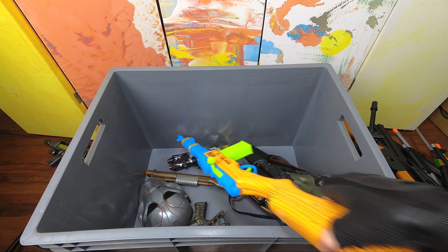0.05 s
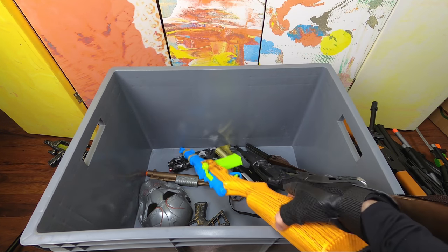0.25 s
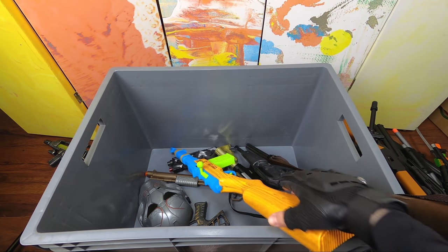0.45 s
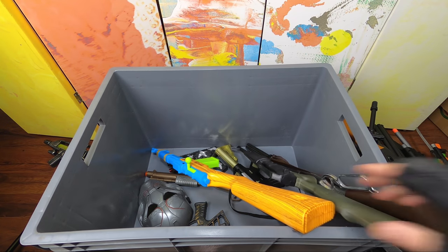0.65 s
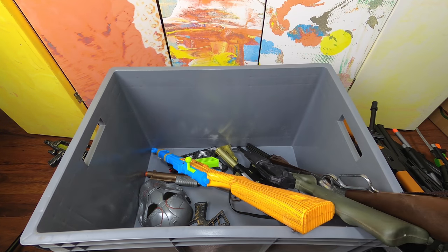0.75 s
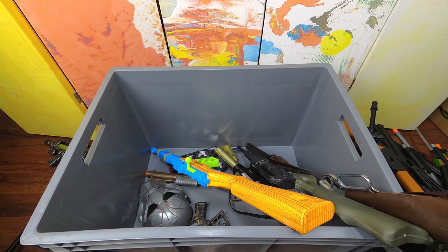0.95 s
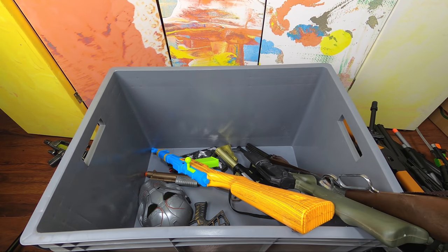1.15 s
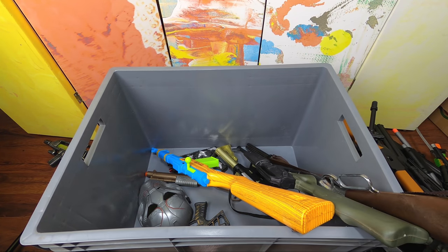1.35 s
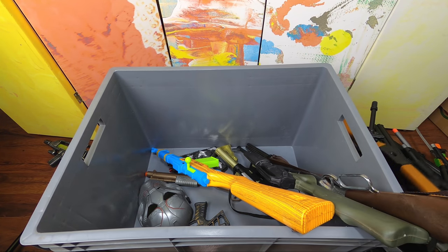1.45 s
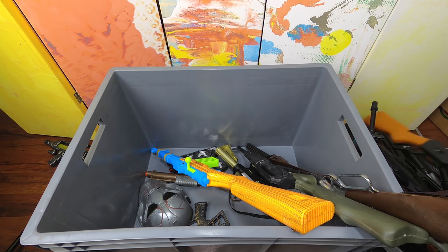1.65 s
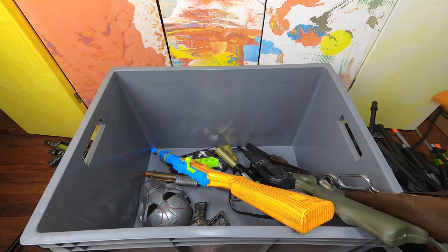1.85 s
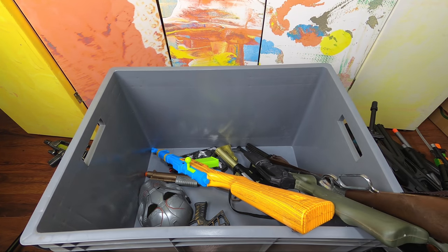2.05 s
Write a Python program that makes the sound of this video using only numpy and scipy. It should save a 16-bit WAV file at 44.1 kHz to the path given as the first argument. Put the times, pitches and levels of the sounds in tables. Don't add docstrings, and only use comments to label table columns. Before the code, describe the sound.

After faint glove clicks, a hard toy gun hits a crate of toys in a rapid burst of clacks and rattles, booms out, then another toy is softly lifted from a heap; close-miked, short indoor echo.

```python
import sys
import numpy as np
from scipy import signal
from scipy.fft import rfft, irfft
from scipy.io import wavfile
from scipy.ndimage import uniform_filter1d

SR = 44100
rng = np.random.default_rng(int(sys.argv[2]) if len(sys.argv) > 2 else 0)


def persist_wave(psi):
    counts = np.round(np.clip(psi, -1, 1) * 32767).astype(np.int16)
    wavfile.write(sys.argv[1], SR, np.atleast_2d(counts).T)


def how_loud(loudness_db):
    steps = np.asarray(loudness_db, float) / 20
    return 10 ** steps


N = 92610

# pitch_hz [Hz], width_hz [Hz], level_db [dB]
SHELL_TONES = [(1023, 57, -35), (1493, 47, 10), (2034, 43, -1.5), (2730, 180, -2), (3220, 230, -3.5),
               (4600, 61, -37)]
SHELL_DB = -5
IMPACT_MS = 0.57
KNOCK_LO_HZ, KNOCK_HI_HZ = 302, 1240
SPREAD = 0.43
SIDES = np.array([[1], [-1]])


def band(x, lo_hz, hi_hz, order=2):
    sos = signal.butter(order, [lo_hz, min(hi_hz, .45 * SR)], "band", fs=SR, output="sos")
    return signal.sosfilt(sos, x)


def unit(x):
    return x / np.abs(x).max()


def fade(t, t60):
    return np.exp(-np.log(1000) * t / t60)


def stereo(middle, side):
    return middle + side * SIDES


def pan(db):
    return how_loud(db * SIDES / 2)


def coloured(x, colour, db):
    c = np.array(colour)
    hz = np.fft.rfftfreq(N, 1 / SR) + 1
    colour_db = np.interp(np.log(hz), np.log(c[:, 0]), c[:, 1], left=-70, right=-70)
    y = irfft(rfft(x) * how_loud(colour_db), N)
    return y * how_loud(db) / np.sqrt(np.mean(y ** 2))


def add(out, x, s):
    i = max(int(s * SR), 0)
    out[..., i:i + x.shape[-1]] += x[..., :N - i]


def rings(x, hz, width, gain):
    total = 0
    for f, w, g in zip(hz, width, gain):
        b, a = signal.iirpeak(f, f / w, fs=SR)
        total = total + g * signal.lfilter(b, a, x)
    return unit(total)


def contacts(table, chatter_ms, impact_ms, top_hz, shell, shell_db, scatter, low_hz, softer_per_db=0):
    out = np.zeros((2, N))
    ms = np.arange(4096) * 1000 / SR
    shell = np.array(shell)
    k = len(shell)
    for s, db, hz, knock_db, tick_db in table:
        u = rng.random((3, 28))
        g = rng.standard_normal((2, 16))
        noise = rng.standard_normal((2, len(ms)))

        lag = -np.log(u[0]) * chatter_ms * (np.arange(28) > 0)
        length_ms = impact_ms * (1 + softer_per_db * max(-11 - db, 0))
        since = np.maximum(ms - lag[:, None], 0) / length_ms
        strength = np.exp(-lag / chatter_ms / 2) * np.where(lag > 0, u[1], how_loud(3.5))
        force = strength @ (since * np.exp(-since))
        blow = force * stereo(noise[0], SPREAD * noise[1])
        blow[:, :2] += 0.3 * np.sqrt(np.sum(blow ** 2) / 4)

        shell_hz = shell[:, 0] * (1 + 0.045 * scatter * g[0, :k])
        shell_gain = how_loud(shell[:, 2] + scatter * 9.5 * g[1, :k])
        body = rings(blow, shell_hz, 2.2 * shell[:, 1], shell_gain)
        ring = rings(blow, [hz], [hz / 9], [1])

        hollow_hz = low_hz * (KNOCK_HI_HZ / low_hz) ** ((np.arange(12) + u[2, :12]) / 12)
        low_blow = band(blow[:1], low_hz / 2, 2 * KNOCK_HI_HZ)
        knock = rings(low_blow, hollow_hz, hollow_hz / 7, np.sign(g[0, -12:]))

        crack = unit(band(blow, hz / 2.47, hz * 3.18))
        tick = unit(band(force * stereo(noise[0], noise[1]), 4030, min(9030, 2 * top_hz)))
        clack = how_loud(-5) * ring + how_loud(shell_db) * body + how_loud(-4.5) * crack
        clack = unit(band(clack, KNOCK_LO_HZ, top_hz))
        add(out, how_loud(db) * (clack + how_loud(knock_db + 2) * knock + how_loud(tick_db - 1) * tick), s)
    return out


def rifle_landing():
    # start_s [s], level_db [dB, peak], pitch_hz [Hz, loudest ring], knock_db [dB], tick_db [dB]
    landings = [(.3195, 3, 4200, -16, -29), (.335, 0.5, 4100, -10, -23), (.347, -3, 3150, -13, -15),
                (.360, -2, 4260, -30, -18), (.384, -7, 1460, -26, -22), (.439, -8.5, 2050, -5, -3.5),
                (.538, -15.5, 1430, -9, -23), (.555, -26, 2000, 3.5, 8), (.588, -4, 617, -4, -32),
                (.594, -2.5, 2340, -5, -8.5), (.631, -22, 1130, 10, -22), (.653, -5, 2960, -33, -3),
                (.663, -7, 1620, -6.5, -29), (.682, -0.5, 1580, -10, -42), (.717, -5.5, 3970, -9, -19),
                (.754, -1, 2880, -16, -11.5), (.781, -9.5, 1400, -2, -39), (.856, -10.5, 1530, -8, -6),
                (.872, -13, 1090, -7.5, -7)]
    return contacts(landings, 6.33, IMPACT_MS, 6020, SHELL_TONES, SHELL_DB, 0.82, KNOCK_LO_HZ)


def more_landings():
    # start_s [s], level_db [dB, peak], pitch_hz [Hz, loudest ring], knock_db [dB], tick_db
    # [dB]
    more_contacts = [(.327, -7, 1510, -8.5, -17), (.352, -9, 1150, -9, -20), (.370, -8, 2100, -4.5, -20),
                     (.392, -12.5, 1560, 0.5, -25), (.412, -11.5, 2500, -12, -24), (.448, -9, 1500, -12, -41),
                     (.468, -14.5, 2000, -15, -6), (.505, -18, 2340, -17, -18), (.602, -6, 700, -8, -21),
                     (.612, -15, 625, -2, -22), (.623, -11, 634, -12, -20), (.670, -10, 1100, -6, -25),
                     (.691, -4.5, 960, -9, -19), (.702, -6, 1470, -17, -19), (.711, -7.5, 1370, -12, -15),
                     (.723, -19.5, 5500, 3.5, -15), (.741, -24, 2000, 6.5, -18), (.759, 0, 1530, -19, -17),
                     (.770, -8, 3570, -3.5, -15), (.790, -10, 1830, -3.5, -30), (.801, -16, 910, -4, -17),
                     (.830, -14, 2590, -12, -26), (.863, -12.5, 1660, -12, -28), (.885, -21.5, 2530, -8, -30)]
    return contacts(more_contacts, 4.68, IMPACT_MS, 6500, SHELL_TONES, SHELL_DB, 0.57, KNOCK_LO_HZ)


def glove_touches():
    # start_s [s], level_db [dB, peak], pitch_hz [Hz, loudest ring], knock_db [dB], tick_db [dB]
    touches = [
        (.026, -32.5, 2480, -38, -9),
        (.038, -33.5, 4960, -35, 2.5),
        (.100, -47, 2560, -4, -16),
        (.182, -25.5, 2640, -44, 0.5),
        (.240, -1, 3800, -13, -7.5),
        (.246, -1, 3960, -16, -10),
    ]
    # pitch_hz [Hz], width_hz [Hz], level_db [dB]
    toy_tones = [(540, 76, -8), (2220, 97, 1.5), (3950, 77, 3), (5070, 220, -6.5), (6070, 110, 1)]
    return contacts(touches, 3.73, IMPACT_MS, 5470, toy_tones, 1.5, 0.086, KNOCK_LO_HZ)


def crate_boom():
    # start_s [s], level_db [dB], contact_ms [ms], spot [0-1 across the wall]
    blows = [(0.243, -12, 4.9, 0.18), (0.291, -11, 2.7, 0.58), (.333, 2, 2.08, 0.21),
             (0.363, -0.5, 1.4, .35), (.402, -2.5, 0.91, 0.26), (0.437, -30, 1.4, 0.31),
             (0.538, -11, 1.8, 0.38), (0.597, -5, 2.1, 0.35), (.655, -10.5, 2.6, 0.34),
             (0.702, -6.5, 1.5, 0.42), (.756, 1, 3.64, 0.37), (.80, -2.5, 2.17, 0.21), (.83, 0, 4.3, 0.22),
             (.865, -2, 4.55, 0.34), (0.977, -1, 7.6, 0.4), (1.101, -17.5, 10.5, 0.46),
             (1.188, -15.5, 10.2, 0.17), (1.354, -12, 11.4, 0.16), (1.402, -15.5, 7, 0.13),
             (1.499, -9, 13.9, 0.24), (1.678, -35.5, 7.1, 0.22)]
    # [s, t60]
    wall_tones = [(56.4, -21, 0.98), (75.17, -1, 0.68), (78.06, -2.5, 0.49), (102.75, 0.5, 0.52),
                  (128.3, 3, 0.29), (162.2, -14, 0.43), (165.3, -3.5, 0.16), (197.06, 4, 0.29),
                  (250.4, -15, 0.4), (260, -5.5, 0.23), (295, -4, 0.36)]
    out = np.zeros(N)
    t = np.arange(SR // 2 + 9000) / SR
    hz, level_db, t60 = np.array(wall_tones).T[:, :, None]
    tones = np.sin(2 * np.pi * hz * t) * fade(t, t60)
    for s, db, ms, spot in blows:
        push = np.sin(np.pi * np.clip(t[:600] * 1000 / ms, 0, 1)) ** 2
        shape = np.cos(np.pi * spot * np.arange(len(hz)))
        wall = (how_loud(level_db[:, 0]) * shape) @ tones
        add(out, how_loud(db) * 0.38 * signal.fftconvolve(wall, push / push.sum()), s)
    return out


def next_toy():
    # start_s [s], level_db [dB, peak], pitch_hz [Hz, loudest ring], knock_db [dB], tick_db [dB]
    heap_touches = [(1.256, -45.5, 1960, -48.5, 4.5), (1.314, -36, 1770, -22, -29),
                    (1.352, -25.5, 3270, -3.5, -11.5), (1.372, -41, 2000, 1, -25),
                    (1.389, -50, 1690, -10, -30), (1.448, -26.5, 1860, -4, -24),
                    (1.468, -20.5, 1510, 1, -11.5), (1.479, -13.5, 1130, -9, -15),
                    (1.495, -18.5, 1510, -13, -22), (1.511, -12.5, 950, -1.5, -12),
                    (1.522, -19, 615, -2, -15), (1.539, -19.5, 603, -7, -22), (1.552, -23, 900, -11, -19),
                    (1.569, -19.5, 915, -28, -32), (1.597, -25.5, 1360, -17, -25),
                    (1.62, -29, 2800, -12.5, -19), (1.796, -34, 2000, -58, -6.5),
                    (1.849, -39, 1450, -35, -29), (1.879, -30.5, 1270, -42, -44.5),
                    (1.939, -40, 1070, 0, -23.5), (2.078, -35.5, 1780, -44, -18)]
    # pitch_hz [Hz], width_hz [Hz], level_db [dB]
    lifted_tones = [(607, 33, -11), (937, 24, 2), (1180, 45, -6.5), (1460, 51, 2.5), (2020, 70, -7.5),
                    (2755, 89, -5), (3280, 63, -9.5), (3600, 51, -5)]
    return contacts(heap_touches, 8.9, 1.11, 3700, lifted_tones, -4.5, 0.44, 0.954 * 276, softer_per_db=0.24)


def rustle():
    # time_s [s], level_db [dB]
    shifting = [(0, -55), (.17, -67.5), (0.299, -32.5), (.5, -34.5), (.7, -33.5), (.9, -37), (1.101, -53),
                (1.242, -59.5), (1.264, -48.5), (1.294, -65.5), (1.372, -43.5), (1.439, -49.5),
                (1.52, -36.5), (1.7, -50), (1.828, -57.5), (1.9, -50.5), (2.03, -60.5), (2.1, -47.5)]
    # pitch_hz [Hz], level_db [dB per Hz]
    scrape_colour = [(180, 15.5), (300, 8.5), (726, -11), (1290, 5), (3170, 3), (8740, -16.5), (15000, -41)]
    grains_per_s, grain_s = 2500, 0.0067
    grains = (rng.random(N) < grains_per_s / SR) * how_loud(2 * rng.exponential(size=N))
    swell = signal.lfilter([1], [1, -np.exp(-1 / (grain_s * SR))], grains)
    scrape = swell * rng.standard_normal((2, N))
    time_s, level_db = np.array(shifting).T
    loudness = how_loud(np.interp(np.arange(N) / SR, time_s, level_db))
    return coloured(stereo(scrape[0], SPREAD * scrape[1]), scrape_colour, 5) * loudness


def room(x):
    # pitch_hz [Hz], decay_s [s, t60], level_db [dB]
    echo_bands = [(132.3, 1, -11.5), (250, 0.54, -1), (538.5, 0.43, 3.5), (951, 0.39, 2), (2000, 0.45, 1.5),
                  (4040, 0.52, -1), (8420, 0.48, -3.5), (14740, 0.58, -1)]
    t = np.arange(SR // 2) / SR
    n = rng.standard_normal((2, len(t)))
    tail = 0
    for hz, t60, db in echo_bands:
        width = min(np.sqrt(hz / 5140), 1)
        echo = band(stereo(n[0], width * n[1]), hz / np.sqrt(2), hz * np.sqrt(2))
        tail = tail + how_loud(db) * echo * fade(t, t60) / np.sqrt(t60 * SR / 14)
    tail = tail * np.clip((t - .002) / 0.0017, 0, 1)
    return signal.fftconvolve(x[None], tail, axes=1)[:, :N]


def air():
    # pitch_hz [Hz], level_db [dB per Hz]
    air_colour = [(18, -73), (30, -5.5), (105, -4), (472, -33.5), (1090, -46), (1650, -46), (3680, -38),
                  (12200, -56.5), (15000, -88)]
    hum_hz, hum_db = 99.2, -44
    t = np.arange(N) / SR
    n = rng.standard_normal((3, N))
    side = n[1] - uniform_filter1d(n[1], size=60)
    hiss = coloured(stereo(n[0], 3.3 * side), air_colour, -51.5)
    wobble = 1 + 12 * uniform_filter1d(uniform_filter1d(n[2], size=2000), size=2000)
    return hiss + how_loud(hum_db) * wobble * np.sin(2 * np.pi * hum_hz * t)


def scene():
    drop = rifle_landing() + more_landings() + glove_touches()
    boom = crate_boom()
    heap = next_toy()
    near = drop * pan(1) + heap * pan(2) + boom + rustle()
    wet = room(drop.mean(0) + how_loud(1.5) * heap.mean(0) + boom)
    left, right = near + wet + air()
    late_left = np.concatenate([left[:1], left[:-1]])
    return np.array([late_left, right])


def band_limit(x):
    return signal.sosfilt(signal.butter(12, 15600, fs=SR, output="sos"), x)


def record(dry):
    limited = dry / (1 + np.abs(dry) ** 12) ** (1 / 12)
    return band_limit(limited)


dry = scene()
out = record(dry)
persist_wave(out)
```